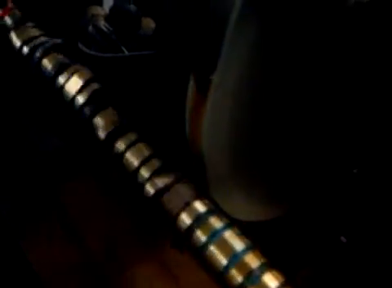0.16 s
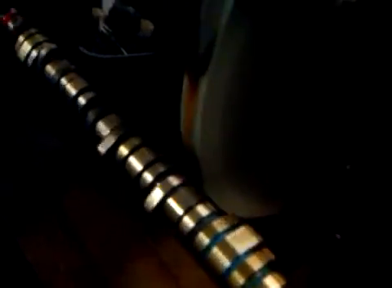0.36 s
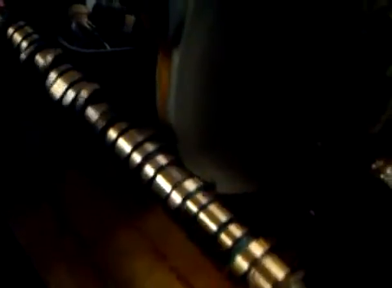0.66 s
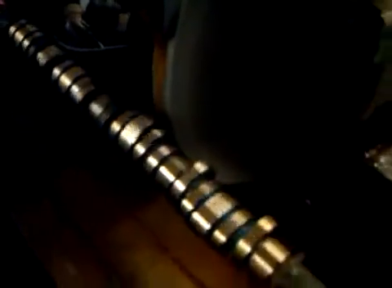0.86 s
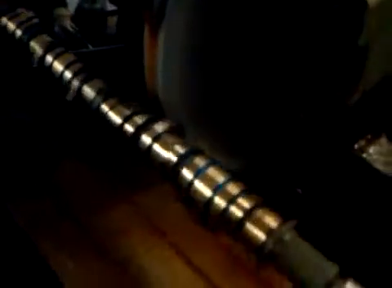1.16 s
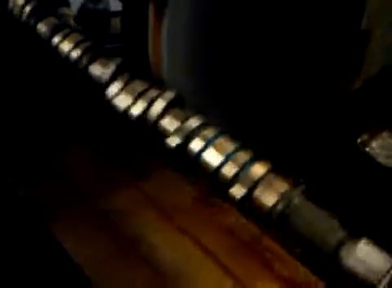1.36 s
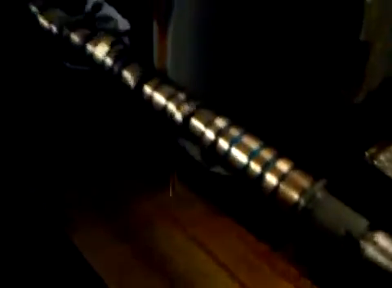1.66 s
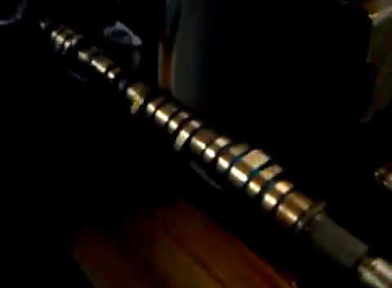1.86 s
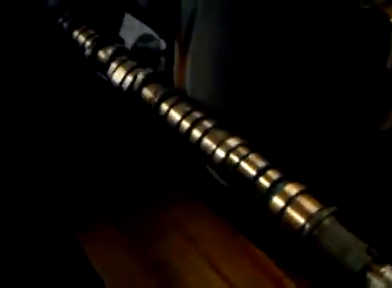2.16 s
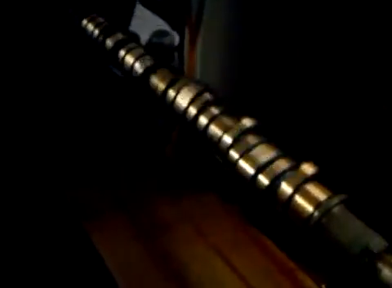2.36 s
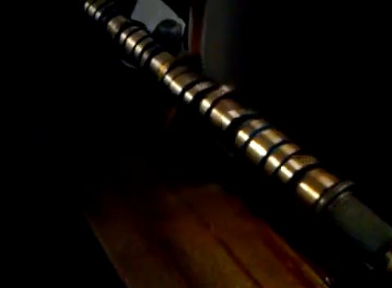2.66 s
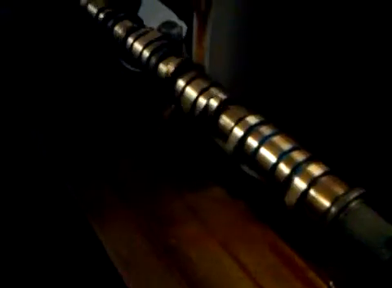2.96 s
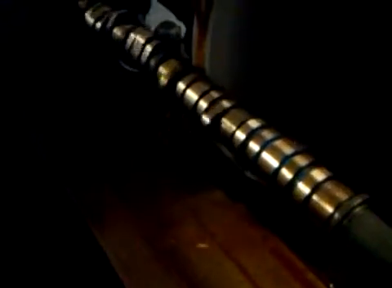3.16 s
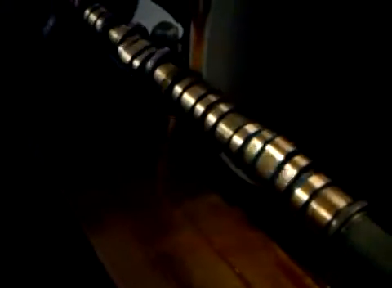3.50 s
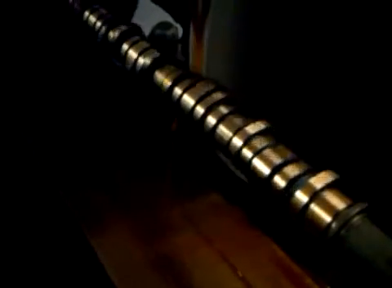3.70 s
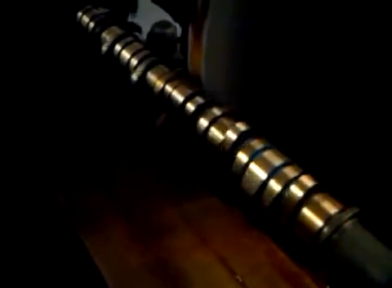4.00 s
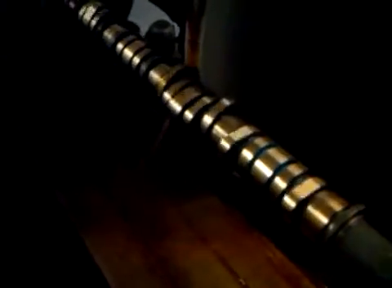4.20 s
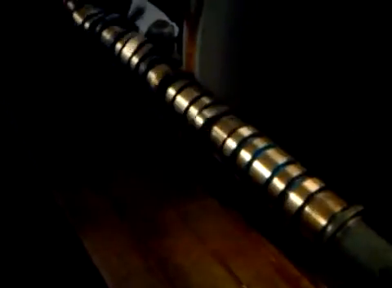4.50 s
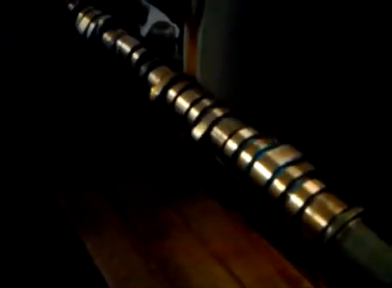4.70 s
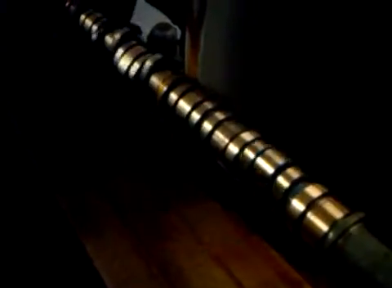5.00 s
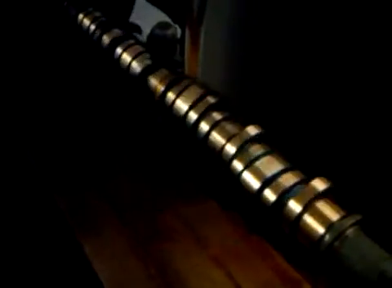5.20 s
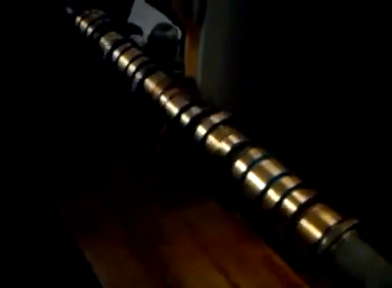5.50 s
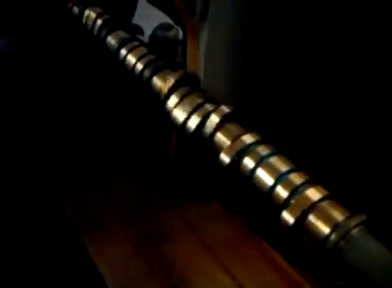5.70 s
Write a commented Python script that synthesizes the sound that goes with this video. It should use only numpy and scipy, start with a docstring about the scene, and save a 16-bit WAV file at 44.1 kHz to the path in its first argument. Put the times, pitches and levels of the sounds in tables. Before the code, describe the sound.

A grinding wheel cuts a turning steel camshaft in three throbbing, ringing rasps over a steady machine whine and hum.

```python
"""A camshaft is ground: it turns and is fed into an abrasive wheel three times, the second after a graze.
The same grit comes round about 24 times a second, so the rasp is a throbbing comb that rings the steel,
while the wheel's waviness drives chatter tones. Resonances flare once a wheel turn and shift as the cam
turns. The drive hums and whines throughout, the spinning wheel hisses, and the machine knocks and clinks
now and then; a loose part rattles against its stop after the first cut."""
import sys
import numpy as np
from scipy import signal
from scipy.fft import rfft, irfft, next_fast_len
from scipy.io import wavfile
from scipy.ndimage import map_coordinates

SR = 44100
rng = np.random.default_rng(int(sys.argv[2]) if len(sys.argv) > 2 else 0)


def dump(signal):
    """Clip the signal to [-1, 1] and save it as 16-bit WAV at the path in sys.argv[1]."""
    limited = np.clip(np.atleast_2d(signal).T, -1, 1)
    pcm = np.round(limited * 32767).astype(np.int16)
    wavfile.write(sys.argv[1], SR, pcm)


N = 257984

# cam meets wheel: (touch [s], catch time [s], feed-in time [s], back-off start [s], back-off time [s],
# clear [s], relative rasp level [dB], relative buzz level [dB])
PASSES = [ (1.86, .005, .17, 2.32, 0.14, 2.475, -37.8, -45),
          (4.346, .013, .03, 4.388, .012, 4.41, -43, -44.2),
          (4.409, .013, .085, 5.318, .07, 5.445, -37.7, -44.8),
          (5.764, .02, .045, 5.9, .06, 6.0, -38.5, -45), ]
def grinding():
    """The wheel cuts the shaft at one place, then at another."""
    first = contact(PASSES[:1], FIRST_CHATTER, FIRST_MODES, high_spot_s=2.103, throb_db=1.5,
                    rough_db=1.5, scrape_db=-2, sing_db=-2.4, chatter_db=.9, body_db=-3, start_db=-2)
    later = contact(PASSES[1:], LATER_CHATTER, LATER_MODES, high_spot_s=4.94, throb_db=2,
                    rough_db=2, scrape_db=-3, sing_db=-2.5, chatter_db=.26, body_db=-5, start_db=-9)
    return cam_turn(first + later)


# low spectrum of the contact: (frequency [Hz], relative density [dB])
BODY_SPECTRUM = [(450, -41.5), (620, -15), (720, -8), (860, -6), (1080, -11), (1280, -3), (1520, -6.5),
                 (1600, -20), (1800, -25.5)]
# resonances flaring once a wheel turn:
# (centre [Hz], half-width [Hz], swing [dB], peak after high spot [turns])
FLARES = [(1260, 170, 1.8, .1), (2300, 220, 2, .2), (4280, 260, 4.4, .11), (4820, 110, 2.8, -.22),
          (5060, 120, 2.2, -.08), (5620, 150, .8, .1), (6430, 140, 1, -.14), (6730, 130, 3.2, .33)]
def contact(passes, waves, modes, high_spot_s, throb_db, rough_db, scrape_db, sing_db, chatter_db,
            body_db, start_db):
    """The wheel's face drives one place on the shaft: a low ringing buzz and a bright rasp."""
    rasp_gain, buzz_gain, load = bite(passes)
    speed_hz = wheel_speed(load)
    high_spot = round(high_spot_s * SR)
    turns = (np.cumsum(speed_hz) - np.sum(speed_hz[:high_spot])) / SR
    pressure_db = throb_db * np.cos(2 * np.pi * turns)  # wheel slightly out of true
    tones = chatter(passes, waves, turns, speed_hz[high_spot], throb_db, rough_db, start_db)
    body = coloured(wheel_face(turns, fresh_share=.15, patchy_db=2), BODY_SPECTRUM)
    buzz = amp(chatter_db) * tones + amp(body_db + .6 * pressure_db) * body
    bright = rasp(modes, turns, load, scrape_db, sing_db)
    return swing_bands(rasp_gain * bright + buzz_gain * buzz, turns, FLARES)


TOUCH_RASP_DB, TOUCH_BUZZ_DB, SPARK_OUT_DB = -8.7, -6.5, -14.5  # relative to the full cut
RING_LAG_RATIO, RING_OUT_S, RING_EXPONENT = 1.5, .034, .85
def bite(passes):
    """Rasp gain, buzz gain and load: the cut catches, deepens with the feed, backs off and sparks out."""
    t = np.arange(N) / SR
    ramp = lambda start_s, length_s: np.clip((t - start_s) / length_s, 0, 1)
    rasp_gain, buzz_gain, load = np.zeros((3, N))
    for touch_s, catch_s, feed_s, back_off_s, retract_s, clear_s, rasp_db, buzz_db in passes:
        shallow = np.exp(-np.maximum(t - touch_s, 0) / feed_s)
        held = 1 - ramp(back_off_s, retract_s)
        touching = ramp(touch_s, catch_s) * (1 - ramp(clear_s, catch_s))
        cut = touching * amp(TOUCH_RASP_DB * shallow) * np.maximum(held, amp(SPARK_OUT_DB))
        load += cut
        rasp_gain += amp(rasp_db) * cut
        ring_in = ramp(touch_s, RING_LAG_RATIO * catch_s)
        ring_out = (1 - ramp(back_off_s, max(retract_s, RING_OUT_S))) ** RING_EXPONENT
        buzz_gain += amp(buzz_db + TOUCH_BUZZ_DB * shallow) * ring_in * ring_out
    return rasp_gain, buzz_gain, load


def wheel_speed(load, free_hz=23.875, sag_hz=.18, inertia_s=.3):
    """Turns a second: the heavy wheel slows gradually under load."""
    step = 1 / (inertia_s * SR)
    return free_hz - sag_hz * signal.lfilter([step], [1, step - 1], load)


def wheel_face(turns, fresh_share, patchy_db, orders=900, size=16384):
    """Contact force: the grit pattern repeats each turn, while a share of it breaks anew."""
    passing = lambda face: np.interp(turns, np.arange(size) / size, unit(face), period=1)
    phases = lambda count: np.exp(2j * np.pi * rng.random(count))
    track = lambda: passing(irfft(np.r_[0, phases(orders)], size))
    wander = .5 * wobble(2.974)  # between two tracks on the wheel
    grit = np.cos(wander) * track() + np.sin(wander) * track()
    patches = passing(irfft(np.r_[0, 0, phases(10)], size))  # some cut harder
    gain = amp(patchy_db * patches + .93 * wobble(150))
    return gain * (np.sqrt(1 - fresh_share) * grit + np.sqrt(fresh_share) * noise())


# high shaft modes at the first and later place of contact: (frequency [Hz], relative level [dB])
FIRST_MODES = [(2870, -68), (3190, -65), (3850, -66), (4200, -62), (4360, -63), (4840, -67), (5030, -63),
               (5362, -55), (5577, -52.5), (5647, -58), (5960, -58), (6153, -54), (6363, -55), (6710, -54)]
LATER_MODES = [(3170, -73), (3430, -70), (3650, -72), (3830, -67), (4110, -59.5), (4320, -54.5),
               (4390, -59.5), (4818, -60.5), (4930, -63), (5055, -55.5), (5206, -62), (5679, -56),
               (5943, -57), (6062, -57), (6150, -52.5), (6344, -55), (6508, -56), (6702, -53)]
# scraping grit: (frequency [Hz], relative density [dB])
GRIT_SPECTRUM = [(1500, -25.5), (1780, -26), (1920, -12.5), (2350, -11), (2750, -17.5), (3200, -13.5),
                 (3600, -12.5), (4000, -14), (4320, -4.5), (4550, -6), (5000, -3), (6250, -1), (6800, -3.5),
                 (7300, -8.5)]
# a proud grain and a worn patch: (angle after high spot [turns], half-width [turns], rasp change [dB])
WHEEL_SPOTS = [(.02, .014, 3), (-.41, .06, -2.2)]
def rasp(modes, turns, load, scrape_db, sing_db, width_hz=22, load_exponent=.3):
    """Grit scrapes the shaft and rings its high modes, each a little unsteadily."""
    scrape = coloured(wheel_face(turns, fresh_share=.12, patchy_db=1), GRIT_SPECTRUM)
    force = wheel_face(turns, fresh_share=.1, patchy_db=2.5)
    mode = lambda hz: unit(signal.lfilter(*signal.iirpeak(hz, hz / width_hz, SR), force))
    sing = unit(sum(amp(db + 1.5 * wobble(6)) * mode(hz) for hz, db in modes))
    spots_db = sum(db * np.exp(-(((turns - at + .5) % 1 - .5) / width) ** 2)
                   for at, width, db in WHEEL_SPOTS)
    return amp(spots_db) * (amp(scrape_db) * scrape + amp(sing_db) * load ** load_exponent * sing)


MAIN_ORDER, ORDERS_PER_TURN, LEAD_TURNS, BUILD_S = 64, 54, .07, .19
# waviness tones at the first and later place of contact: (nominal frequency [Hz], relative level [dB])
FIRST_CHATTER = [(786, -62), (833, -64), (931, -61), (953, -55), (1143, -64), (1238, -65), (1287, -58),
                 (1310, -65), (1357, -59), (1480, -54), (1502, -59), (1523, -50), (1954, -66), (2169, -64),
                 (2266, -66)]
LATER_CHATTER = [(854, -64), (877.5, -61), (902, -64), (950, -51.8), (1141, -60), (1238, -57.5),
                 (1259, -64), (1283, -66), (1306, -68), (1425, -63), (1473, -58.5), (1518, -47.5),
                 (1900, -69), (2137, -68), (2374, -65.5), (3420, -68)]
def chatter(passes, waves, turns, wheel_hz, throb_db, rough_db, start_db):
    """Waviness sounds at multiples of wheel speed; the main tone feeds on itself and builds up."""
    tones, young = np.zeros((2, N))
    for touch_s, *_ in passes:
        age_s = np.arange(N) / SR - touch_s
        young = np.where(age_s >= 0, np.exp(-np.abs(age_s) / BUILD_S), young)
    wave_turns = turns + LEAD_TURNS
    for hz, db in waves:
        order = np.round(hz / wheel_hz)
        lag_turns = (MAIN_ORDER - order) / ORDERS_PER_TURN  # lower orders bunch up later in the turn
        depth_db = throb_db * min(order / MAIN_ORDER, 1) ** 2
        swing_db = depth_db * np.cos(2 * np.pi * (wave_turns - lag_turns))
        build_db = start_db * young * (order == MAIN_ORDER)
        flicker_db = 1.5 * wobble(5.21) + rough_db * wobble(70)
        cycles = order * wave_turns + .5 * (MAIN_ORDER - order) * lag_turns
        tones += amp(db + swing_db + build_db + flicker_db) * np.sin(2 * np.pi * cycles)
    return unit(tones)


# resonances round the cam lobe: (centre [Hz], half-width [Hz], swing [dB], peak time [s])
LOBE_BANDS = [(920, 110, 1, 4.95), (1300, 80, 5, 4.55), (1505, 45, 2.8, 5.09), (1880, 75, 4, 3.7),
              (2850, 330, 2.5, 5.14), (3400, 130, 1.5, 5.03), (3970, 200, 4, 5.28), (4350, 130, 2.5, 4.71),
              (4830, 90, 3.5, 5.08), (5050, 90, 4, 5.03)]
def cam_turn(x, turn_s=.742):
    """Shaft resonances swell and fade as the contact moves round the lobe."""
    bands = [(hz, width_hz, db, peak_s / turn_s) for hz, width_hz, db, peak_s in LOBE_BANDS]
    return swing_bands(x, np.arange(N) / SR / turn_s, bands)


# hits on the stop: (time [s], level [dB])
STOP_HITS = [(2.4795, -36), (2.489, -47), (2.496, -36), (2.509, -36)]
# modes of the loose part: (frequency [Hz], relative level [dB], t60 [s])
STOP_MODES = [(290, -16, .04), (355, -6.5, 0.055), (405, 1.5, 0.06), (721, -4, 0.035), (904, -9, 0.04),
              (1250, -12, .03), (1543, -15, 0.06), (1760, -16, 0.05), (1960, -12, 0.06), (2870, -15, 0.035)]
# dry crack of a hit: (frequency [Hz], relative density [dB])
CRACK_SPECTRUM = [(400, -4), (900, 0), (2000, -14), (3500, -11), (7300, -22)]
def clunk(crack_db=-8, crack_t60_s=.028, low_cut_hz=155):
    """A loose heavy part rattles against its stop; each hit cracks and rings a little differently."""
    out, cracks = np.zeros((2, N))
    age_s = np.arange(SR // 4) / SR
    for time_s, db in STOP_HITS:
        start = round(time_s * SR)
        span = slice(start, start + len(age_s))
        cracks[span] += amp(db + crack_db - 60 * age_s / crack_t60_s)
        for hz, mode_db, t60_s in STOP_MODES:
            detune, louder = rng.standard_normal(2)
            ring = np.sin(2 * np.pi * hz * (1 + .025 * detune) * age_s)
            out[span] += amp(db + mode_db + 1.7 * louder - 60 * age_s / t60_s) * ring
    out += cracks * coloured(noise(), CRACK_SPECTRUM)
    # low cut takes the deep thud out of each hit's abrupt start
    return signal.sosfilt(signal.butter(2, low_cut_hz, 'highpass', fs=SR, output='sos'), out)


# dull bumps: (time [s], relative level [dB], t60 [s])
KNOCKS = [(1.395, -54.5, 0.32), (1.513, -45.5, 0.28), (1.573, -44.5, 0.33), (2.243, -44.5, 0.25),
          (2.452, -38.5, 0.19), (2.547, -40.5, 0.17), (2.882, -43.5, 0.39), (4.367, -40.5, 0.17),
          (5.796, -45.5, 0.19)]
# machine bed: (frequency [Hz], relative density [dB])
BED_SPECTRUM = [(100, -14), (240, -13.5), (330, 3), (410, -2.5), (510, -12), (700, -14.5), (1400, -22.5),
                (3000, -44.5)]
def knocks():
    """Each bump shakes the crowded modes of the heavy bed; the longer it lasts, the softer it starts."""
    power = np.zeros(N)
    for time_s, db, t60_s in KNOCKS:
        age_s = np.maximum(np.arange(N) / SR - time_s, 0)
        attack = 1 - np.exp(-age_s / (.02 * t60_s))
        power += (amp(db - 60 * age_s / t60_s) * attack) ** 2
    return amp(-3.5) * np.sqrt(power) * coloured(noise(), BED_SPECTRUM)


# metal clinks and scuffs: (time [s], level [dB], t60 [s], centre [Hz], half-width [octaves])
CLINKS = [(.181, -53.5, 0.13, 6060, .1), (.475, -53, 0.23, 4500, 1.8), (.594, -46.5, 0.031, 6800, 0.18),
          (.84, -57.5, 0.39, 970, 0.35), (1.066, -39.5, 0.042, 1840, 0.25), (1.07, -50, 0.48, 1715, 0.24),
          (1.587, -50.5, 0.08, 4400, 0.61), (2.477, -38, 0.077, 4700, 0.68), (2.477, -43, 0.24, 1640, 0.39),
          (2.499, -40.5, 0.064, 5060, 0.76)]
def clinks(attack_s=.00079):
    """Metal parts meet: a dense cluster of ringing that dies quickly."""
    out = np.zeros(N)
    for time_s, db, t60_s, centre_hz, octaves in CLINKS:
        age_s = np.maximum(np.arange(N) / SR - time_s, 0)
        band = lambda hz: 1 / (1 + (np.log2((hz + 1) / centre_hz) / octaves) ** 2)
        cluster = unit(filtered(noise(), band))
        out += amp(db - 60 * age_s / t60_s) * (1 - np.exp(-age_s / attack_s)) * cluster
    return out


# main whine: (time [s], level [dB])
WHINE_LEVELS = [(0, -55), (1, -57), (1.7, -59), (2.4, -54), (3.2, -56.5), (4.8, -54.5), (5.85, -57.5)]
# motor and belts: (frequency [Hz], relative level [dB])
HUM_TONES = [(34.3, -13.5), (102.8, -8), (120, -3.5), (137.2, -4.5), (211, -10)]
# motor hum swells: (time [s], half-width [s], gain [dB])
HUM_SWELLS = [(1.55, 0.45, 6), (2.58, 0.38, 3), (3.15, 0.27, 5.5)]
# bearings: (frequency [Hz], level [dB])
BEARING_TONES = [(845.2, -74.5), (1077, -76), (1427, -69.5), (2116, -78), (2821, -75.5), (3171, -85.5),
                 (3806, -89.5), (4226, -77)]
def drive(side_tone_db=-68, hum_db=-64.5):
    """Motor hum, a clean beating whine and faint unsteady bearing tones."""
    whine_db = np.interp(np.arange(N) / SR, *np.transpose(WHINE_LEVELS))
    whine = amp(whine_db) * tone(645.7, drift_hz=.59, rate_hz=4.84)
    whine += amp(side_tone_db) * tone(663.7, drift_hz=.98, rate_hz=4.93)
    hum = sum(amp(db + 2 * wobble(4)) * tone(hz, drift_hz=.63, rate_hz=6) for hz, db in HUM_TONES)
    bearings = sum(amp(db + 2.1 * wobble(8.2)) * tone(hz, drift_hz=.0111 * hz, rate_hz=140)
                   for hz, db in BEARING_TONES)
    return whine + amp(hum_db + bells(np.arange(N) / SR, HUM_SWELLS)) * hum + bearings


# frame rumble, dragged air and wheel hiss: (frequency [Hz], relative density [dB])
RUMBLE_SPECTRUM = [(18, -15.5), (35, -16), (60, -7.5), (90, -6), (130, 1.5), (175, -4), (250, -3.5),
                   (380, -5.5), (540, -7), (780, -41.5)]
AIR_SPECTRUM = [(450, -19.5), (650, 2.5), (900, -1), (1300, -4), (1700, -6), (2500, -8.5), (3500, -9),
                (5000, -9), (7300, -15.5)]
HISS_SPECTRUM = [(2500, -27), (3700, -4.5), (4250, 2), (4600, -1.5), (5500, 1.5), (6600, 4.5), (7300, -5)]
# wheel hiss swells and dips: (time [s], half-width [s], gain [dB])
HISS_SWELLS = [(1.4, 0.42, -1), (3.28, 0.54, 6), (3.85, 0.13, 4), (4.25, 0.14, 4), (5.52, 0.026, 6.5)]
def idle_noise(rumble_db=-62.5, air_db=-61, hiss_db=-64):
    """The frame rumbles and the spinning wheel drags hissing air with it."""
    rumble = amp(rumble_db + 2 * wobble(12)) * coloured(noise(), RUMBLE_SPECTRUM)
    air = amp(air_db + 1.9 * wobble(20.99)) * coloured(noise(), AIR_SPECTRUM)
    swell_db = bells(np.arange(N) / SR, HISS_SWELLS)
    hiss = amp(hiss_db + swell_db + 1.4 * wobble(25)) * coloured(noise(), HISS_SPECTRUM)
    return rumble + air + hiss


def swing_bands(x, turns, bands):
    """Each band of x swells and fades once a turn, at its own angle."""
    out = x
    for centre_hz, width_hz, swing_db, peak_turns in bands:
        band = filtered(x, lambda hz: np.exp(-((hz - centre_hz) / width_hz) ** 4))
        swing = unit(amp(swing_db * np.cos(2 * np.pi * (turns - peak_turns))))
        out = out + band * (swing - 1)
    return out


def amp(db):
    """Decibels to gain."""
    return 10 ** (np.asarray(db) / 20)


def unit(x):
    """Scale to rms 1."""
    return x / np.sqrt(np.mean(x ** 2) + 1e-20)


def noise():
    """White noise."""
    return rng.standard_normal(N)


def wobble(rate_hz, hop=64):
    """Smooth random curve, rate_hz knots a second."""
    at = np.arange(0, N + hop, hop)
    knots = rng.standard_normal(int(N * rate_hz / SR) + 4)
    return np.interp(np.arange(N), at, map_coordinates(knots, [at * rate_hz / SR]))


def tone(hz, drift_hz, rate_hz):
    """Sine of rms 1 with wandering pitch."""
    cycles = np.cumsum(hz + drift_hz * wobble(rate_hz)) / SR
    return np.sqrt(2) * np.sin(2 * np.pi * (cycles + rng.random()))


def bells(axis, rows):
    """Sum of bell curves along axis."""
    return sum(height * np.exp(-((axis - centre) / width) ** 2) for centre, width, height in rows)


def filtered(x, response):
    """Filter x by a gain function of frequency."""
    size = next_fast_len(N + SR // 2)
    return irfft(rfft(x, size) * response(np.fft.rfftfreq(size, 1 / SR)), size)[:N]


def coloured(x, spectrum):
    """x shaped by (frequency [Hz], gain [dB]) points, at rms 1."""
    points_hz, db = np.transpose(spectrum)
    return unit(filtered(x, lambda hz: amp(np.interp(np.log(hz + 1), np.log(points_hz), db, -120, -120))))


def scene():
    """The whole machine from close by, in mono."""
    return (grinding() + drive() + idle_noise() + knocks() + clunk() + clinks())[None]


# cancelled bands: (centre [Hz], half-width [Hz], gain [dB])
NOTCHES = [(3300, 12, -10), (3976, 40, -18.5)]
def record(dry, top_hz=7300):
    """Reflections near the microphone cancel two narrow bands; a steep band limit cuts the top."""
    notched = filtered(dry[0], lambda hz: amp(bells(hz, NOTCHES)))
    return filtered(notched, lambda hz: 1 / np.sqrt(1 + np.minimum(hz / top_hz, 2) ** 500))[None]


dry = scene()
out = record(dry)
dump(out)
```